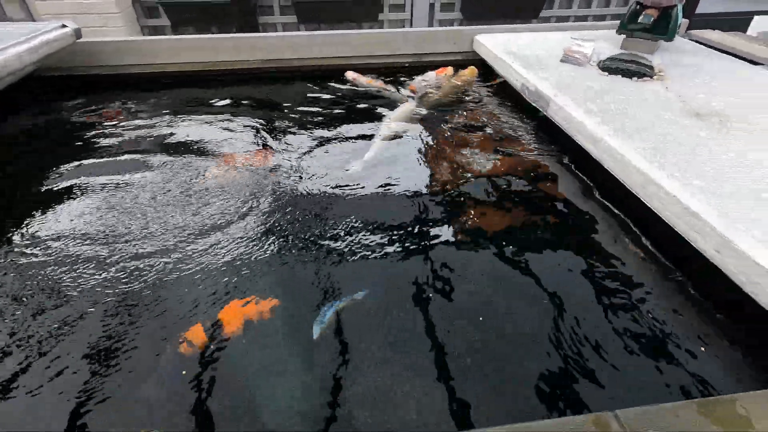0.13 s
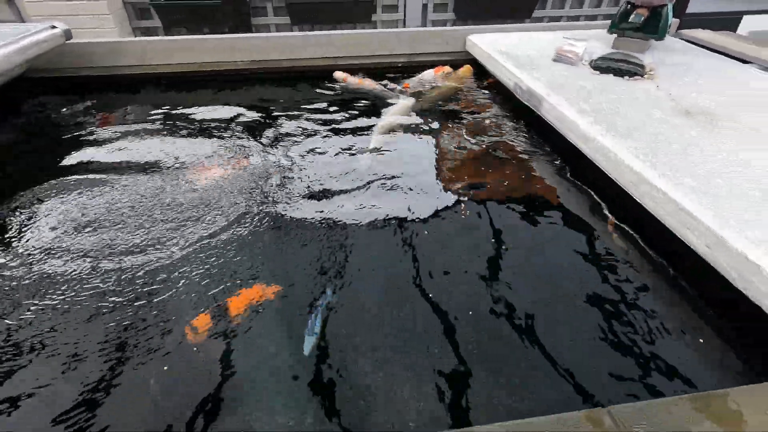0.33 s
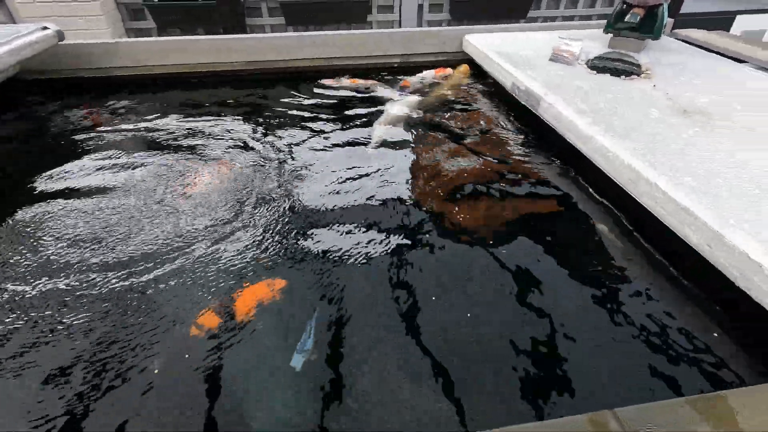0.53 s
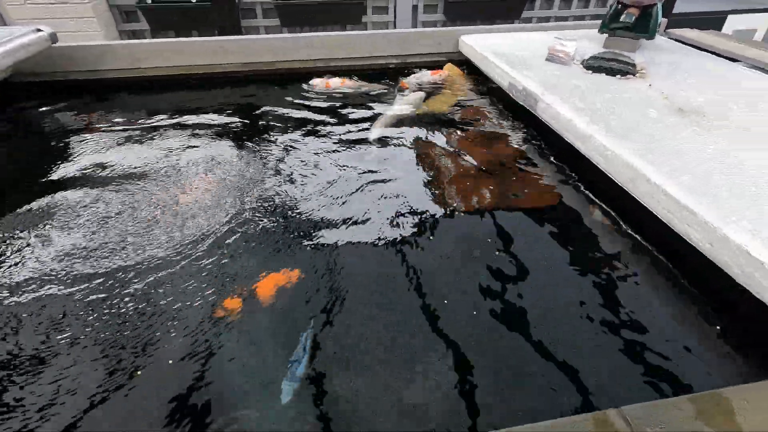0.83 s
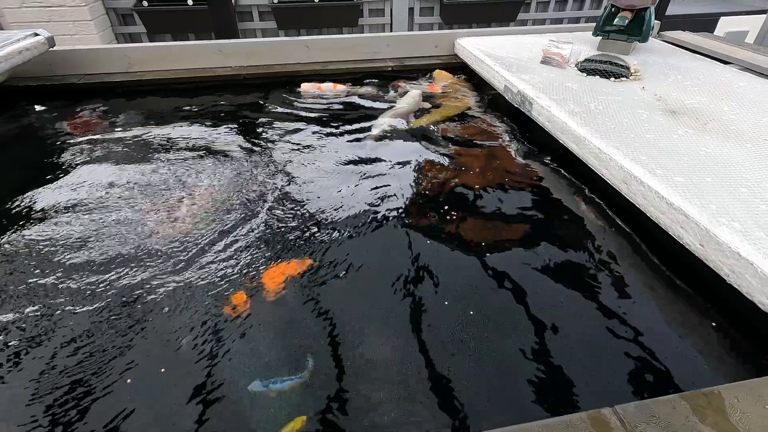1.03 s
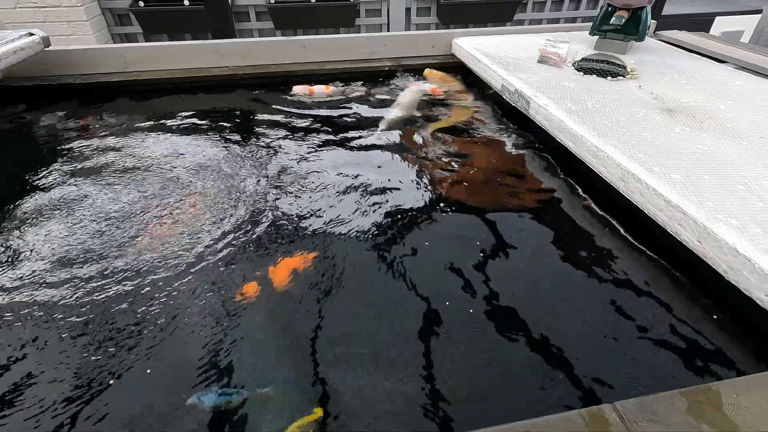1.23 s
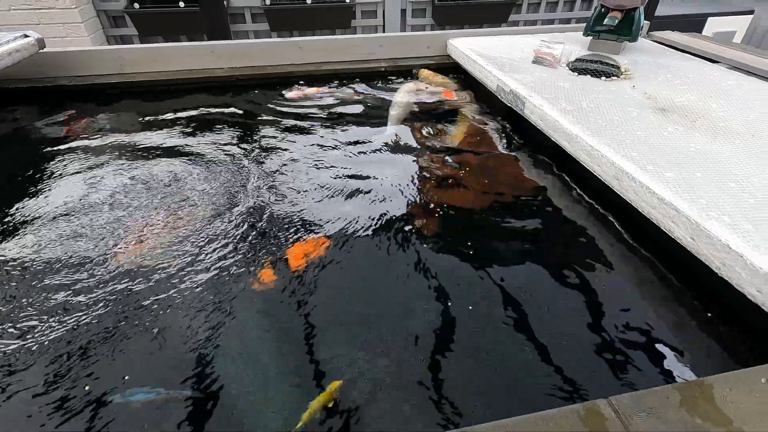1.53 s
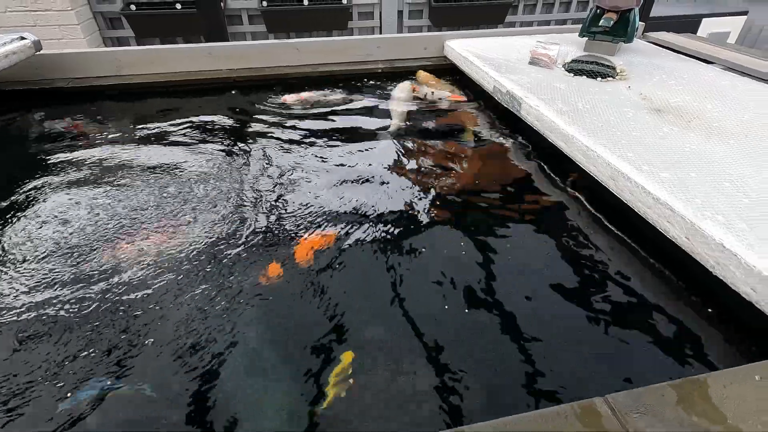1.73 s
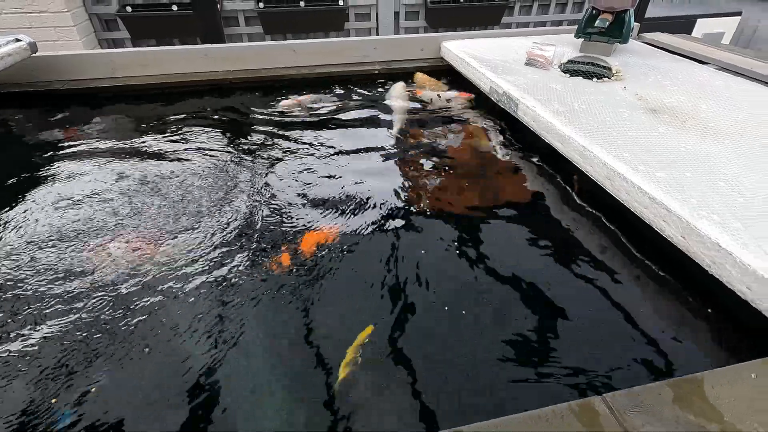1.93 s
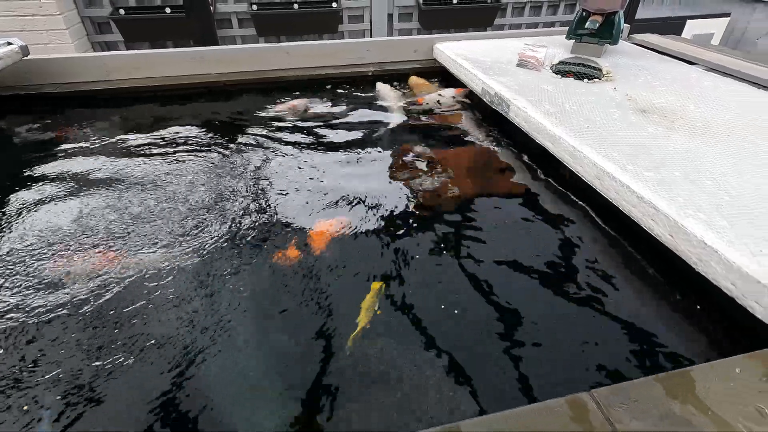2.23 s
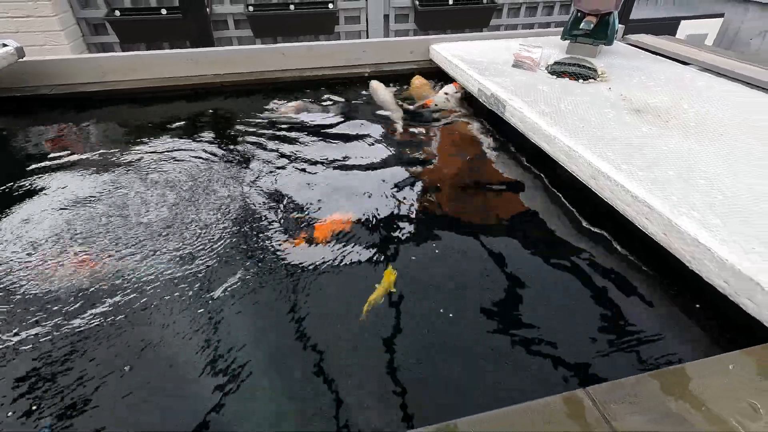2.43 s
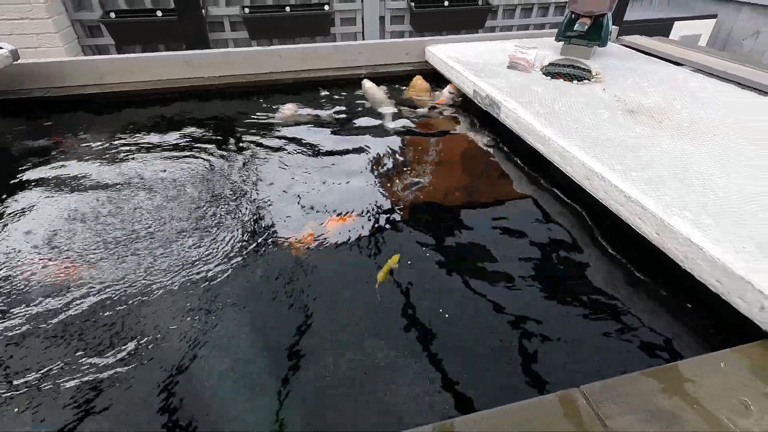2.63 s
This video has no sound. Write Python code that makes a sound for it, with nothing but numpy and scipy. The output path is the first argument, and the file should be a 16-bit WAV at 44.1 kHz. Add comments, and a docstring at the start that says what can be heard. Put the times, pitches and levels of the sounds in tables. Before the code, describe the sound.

Fish mouths plop and slap the water, bubbles trickling, one sharp snap, above a soft steady hum

```python
"""Koi feed at the surface of a walled garden pond: gulps and plops are damped sines that rise in pitch.
Slaps throw short sprays of ringing droplets and a puff of filtered noise; closing air pockets glide up.
Clumps of small bubbles trickle over a soft noise hiss, and the pond's walls answer with a brief noise tail.
A pump hums as two wavering tones over a low rumble, faint high whistles glide past,
and wind bumps the microphone once as a damped low sine."""
import sys
import numpy as np
from scipy import signal
from scipy.fft import rfft, irfft, next_fast_len
from scipy.io import wavfile
from scipy.ndimage import uniform_filter1d, map_coordinates

SR = 44100
rng = np.random.default_rng(int(sys.argv[2]) if len(sys.argv) > 2 else 0)


def field_ratio(decibels):
    """Amplitude ratio for a level in dB (20 dB per decade); scalars and array-likes work."""
    return 10 ** (np.asarray(decibels, dtype=float) / 20)


def wav_record(signal):
    """Record a signal, one row per channel, as 16-bit PCM in the file named by sys.argv[1]."""
    frames = np.transpose(np.atleast_2d(signal))
    bounded = np.clip(frames, -1, 1)
    # unit amplitude maps onto the largest positive 16-bit level
    quanta = np.round(bounded * 32767).astype(np.int16)
    wavfile.write(sys.argv[1], SR, quanta)


N = 123479  # samples

# Large bubbles. Each row: start in seconds, relative level in dB, starting pitch in Hz,
# time to ring down by 60 dB in seconds.
LARGE_BUBBLES = [(.002, -26.5, 1210, 0.015), (0.047, -34, 1035, 0.028), (0.1175, -20.5, 1300, 0.0078),
                 (.255, -37, 985, 0.024), (.31, -43.5, 1863, 0.11), (0.335, -26.5, 930, 0.021),
                 (0.37, -28, 1216, 0.025), (0.371, -47, 2630, 0.033), (0.418, -43, 915, 0.05),
                 (0.443, -32, 1007, 0.048), (0.456, -34, 1020, 0.026), (.495, -31.5, 482, 0.09),
                 (0.584, -39, 1170, 0.028), (.625, -28, 1670, 0.016), (.63, -32.5, 6260, 0.01),
                 (.634, -29, 458, 0.028), (0.662, -32, 1420, 0.017), (.744, -39, 510, 0.052),
                 (0.768, -33, 1012, 0.035), (0.773, -33, 1230, 0.025), (.863, -27, 512, 0.038),
                 (.888, -28, 1187, 0.017), (0.888, -46.5, 3480, 0.037), (0.914, -35.5, 1183, 0.048),
                 (1.104, -42.5, 2790, 0.021), (1.112, -43, 984, 0.096), (1.226, -34.5, 1040, 0.026),
                 (1.237, -42, 1030, 0.023), (1.289, -28, 1368, 0.019), (1.312, -35, 4520, 0.007),
                 (1.394, -35, 2510, 0.013), (1.423, -26.5, 2556, 0.018), (1.533, -23.5, 354, 0.026),
                 (1.544, -32.5, 956, 0.034), (1.656, -42.5, 3800, 0.0098), (1.731, -38.5, 698, 0.028),
                 (1.823, -38, 1207, 0.029), (2.282, -28.5, 941, 0.038), (2.292, -26, 930, 0.014),
                 (2.641, -25, 674, 0.032), (2.676, -47, 1840, 0.034), (2.703, -33, 1790, 0.033),
                 (2.727, -44.5, 4070, 0.032), (2.755, -50.5, 2430, 0.029), (2.784, -43, 1960, 0.028)]
# Air pockets closing. Each row: start in seconds, relative level in dB, start pitch in Hz,
# length in seconds, end pitch in Hz.
POCKET_GLIDES = [(.338, -28, 620, .035, 1000), (.537, -33, 920, .025, 1250), (.565, -32, 950, .035, 1450),
                 (.562, -40, 480, .045, 800), (1.024, -35, 1500, .016, 2200), (1.172, -31, 1200, .02, 2300),
                 (1.96, -43, 860, .07, 1900), (2.027, -42, 760, .04, 1600), (2.272, -40, 520, .025, 850)]
# The surface film snapping. Each row: start in seconds, relative level in dB, pitch in Hz.
FILM_SNAPS = [(.1173, -22, 3000), (.433, -26, 1700), (.481, -31, 3200), (.605, -37, 5000),
              (.712, -38, 6000), (.79, -39, 7000), (.9393, -3.5, 2850), (.9436, -8, 2200),
              (1.108, -30, 1500), (1.172, -28, 600), (1.392, -29, 3600), (2.126, -34, 2600),
              (2.146, -33, 1600), (2.244, -28, 800), (2.6455, -12, 3700)]
# Slaps and their sprays. Each row: start in seconds, relative level in dB, middle droplet pitch in Hz,
# length in seconds, pitch scatter in octaves.
SLAPS = [(.003, -36.5, 1520, 0.074, 0.12), (0.1157, -36, 3000, .03, 0.34), (0.253, -36, 2250, 0.082, 0.55),
         (0.279, -40, 3650, 0.17, 0.48), (0.417, -32.5, 3240, 0.14, 0.13),
         (0.432, -33.5, 2100, 0.041, 0.78), (0.627, -32.5, 2010, 0.077, 0.81),
         (0.936, -21, 2070, 0.069, 0.85), (.939, -28.5, 853, 0.031, 0.64), (1.186, -39, 3560, 0.064, 0.59),
         (1.546, -38, 2770, 0.075, 0.91), (1.776, -37.5, 2360, 0.03, 0.96),
         (1.792, -38, 4000, 0.027, 0.066), (1.88, -47, 980, 0.038, 0.48), (1.917, -31.5, 957, 0.067, 0.54),
         (2.621, -38.5, 11600, .03, 0.12), (2.637, -26.5, 1236, 0.051, 0.7), (2.651, -36, 4970, 0.059, 1.1)]
# Swell of the small bubbles. Each row: time in seconds, relative level in dB.
TRICKLE_LEVEL = [(0, -49.5), (.17, -51.5), (.3, -38), (.6, -48), (.7, -48), (1.1, -45.5), (1.35, -51),
                 (1.5, -43), (1.65, -51.5), (2.0, -51.5), (2.2, -48.5), (2.55, -47.5), (2.68, -47.5)]
# Swell of the water hiss, followed by the fizz. Each row: time in seconds, relative level in dB.
HISS_LEVEL = [(0, -59), (.27, -53.5), (.45, -52.5), (.54, -57), (.7, -53), (1.2, -55), (1.8, -54.5),
              (2.5, -55), (2.68, -53)]
# Tone colour of the hiss. Each row: frequency in Hz, relative level in dB.
HISS_SPECTRUM = [(150, 13), (290, 1), (810, -10.5), (968, -4), (3050, -13.5), (6890, -11.5), (9000, -24),
                 (12300, -18), (13600, -34), (15600, -65)]
# Tone colour of the rumble. Each row: frequency in Hz, relative level in dB.
RUMBLE_SPECTRUM = [(15, -9), (35, 1), (50, 0), (65, -4.5), (100, 1.5), (260, -9.5), (450, -11),
                   (900, -45.5)]
# Stereo width of the hiss and rumble. Each row: frequency in Hz, left-right correlation from 0 to 1.
LIKENESS = [(25, 0.3), (100, .85), (300, .8), (1400, 0.55), (3100, 0.45), (6800, 0.75), (13000, 0.55)]
# Decay of the wall reflections. Each row: frequency in Hz, time to fall by 60 dB in seconds.
WALL_DECAY = [(200, 0.047), (2000, 0.11), (10000, 0.022)]
# Swell of the lower pump tone. Each row: time in seconds, level in dB.
HUM_LEVEL = [(0, -44.5), (.3, -42), (.45, -39.5), (.6, -38.5), (.76, -37), (1.0, -40.5), (1.35, -44),
             (1.9, -39), (2.0, -38), (2.1, -33.5), (2.22, -37.5), (2.7, -42)]
# Faint whistles. Each row: start in seconds, length in seconds, start pitch in Hz, end pitch in Hz,
# relative level in dB.
FAINT_WHISTLES = [(.65, .14, 3800, 4500, -55), (1.69, .12, 3000, 4000, -57), (2.08, .08, 10750, 11050, -66),
                  (2.40, .17, 11250, 10900, -66)]
# Colour difference of the two microphones. Each row: frequency in Hz, left over right in dB.
LEFT_OVER_RIGHT_DB = [(30, 1.5), (600, 0), (1800, -1.8), (12000, 4.5)]

BUBBLE_RISE = 0.11  # share of the pitch gained over the ring time
TWIN_DB, TWIN_DETUNE = -7, 0.07  # the smaller neighbour: trim in dB, greatest detune as a share of pitch
ROUGH, ROUGH_PER_S = 0.5, 240  # depth of the random roughness, knots a second
GLIDE_BEND, GLIDE_FADE_DB = 1.8, 10  # curve of the pitch sweep, fade over its length
SNAP_TURNS = 12  # cycles to fall by 60 dB
DROPLETS_PER_SLAP, DROPLET_TURNS = 38, 8.3  # turns: cycles to fall by 20 dB
SPRAY_DB, SPRAY_FADE_DB = -3, 51  # trim on the slap level, fade over its length
UNEVEN_DB = 2.5  # spread of level from droplet to droplet and bubble to bubble
MIST_DB, MIST_HZ = -21.5, 5940  # trim on the slap level, corner of the treble tilt
CLUMP_SIZE, CLUMP_S, CLUMP_UNEVEN_DB = 9, 0.012, 3.2  # bubbles, spread in seconds, strength in dB
TRICKLE_HZ, FIZZ_HZ, FIZZ_DB = 1092, 5490, -8  # middle pitches, fizz trim on the hiss curve
WALLS_DB, WALLS_UNLIKE = -8.5, 0.39  # level of the answer, share that differs between sides
BUMP_AT_S, BUMP_HZ, BUMP_DB, BUMP_T60_S = 2.174, 38, -17.5, 0.039
HUM_HZ, HUM_WAVER_DB = 121.5, 0.8
UPPER_HUM_HZ, UPPER_HUM_DB = 200.2, -51
RUMBLE_DB, RUMBLE_PATCHY_DB = -46.5, 2
HISS_PATCHY_DB, SURGE_DB = 1.5, 1.2
TOP_HZ, LEFT_LAG_S = 15730, 0.85 / SR


def unit(x):
    """Scale to rms 1."""
    return x / np.sqrt(np.mean(x ** 2) + 1e-20)


def along(points, hz):
    """Read (Hz, value) points on a log frequency axis."""
    f, v = np.transpose(points)
    return np.interp(np.log(hz + 1), np.log(f + 1), v)


def curve(points):
    """Join (seconds, value) points into one value per sample."""
    s, v = np.transpose(points)
    return np.interp(np.arange(N) / SR, s, v)


def wobble(rate):
    """A smooth random curve with rate knots a second."""
    return map_coordinates(rng.standard_normal(int(N * rate / SR) + 4), [np.arange(N) * rate / SR])


def filtered(x, response):
    """Shape x by a response given as a function of frequency."""
    m = next_fast_len(N + 8192)
    return irfft(rfft(x, m) * response(np.fft.rfftfreq(m, 1 / SR)), m)[..., :N]


def progress(start, length):
    """A ramp from 0 to 1 over one event, held outside it."""
    return np.clip((np.arange(N) / SR - start) / length, 0, 1)


def sine(hz):
    """A sine that follows a pitch curve, by summing its phase."""
    return np.sin(2 * np.pi * np.cumsum(hz) / SR)


def rush(spectrum, patchy_db):
    """Stereo noise of rms 1, with random gain patches in time and pitch and a set left-right likeness."""
    z = signal.stft(rng.standard_normal((2, N)), nperseg=512)[2]
    field = uniform_filter1d(rng.standard_normal(z.shape[1:]), size=8, axis=0)
    field = uniform_filter1d(field, size=5, axis=1)
    pair = signal.istft(z * field_ratio(patchy_db * unit(field)), nperseg=512)[1][:, :N]

    def response(hz):
        # sharing power between mid and side by this angle sets the correlation
        angle = np.arccos(np.clip(along(LIKENESS, hz), -1, 1)) / 2
        return field_ratio(along(spectrum, hz)) * [np.cos(angle), np.sin(angle)]

    mid, side = filtered(pair, response)
    return unit(np.array([mid + side, mid - side]))


def bubbles(s, db, hz, t60, rise, pan_db, size, attack_turns=0.27):
    """Ringing air: damped sines of rising pitch, swelling over attack_turns cycles, summed in stereo."""
    t = np.arange(size) / SR
    columns = np.broadcast_arrays(s, db, hz, t60 + 1e-4, rise, pan_db)
    s, db, hz, t60, rise, pan_db = [np.reshape(v, (-1, 1)) for v in columns]
    hz = np.clip(hz, 100, SR / 3)
    phase = 2 * np.pi * hz * (t + rise * np.minimum(t, t60) ** 2 / (2 * t60))
    attack = 1 - np.exp(-t * hz / attack_turns)
    ring = field_ratio(db - 60 * t / t60) * attack * np.sin(phase)
    at = np.clip(np.round(s * SR).astype(int), 0, N) + np.arange(size)

    def placed(side):
        return np.bincount(at.ravel(), (ring * field_ratio(side * pan_db / 2)).ravel(), N + size + 1)[:N]

    return np.array([placed(1), placed(-1)])


def scatter(level_db, count, centre_hz, spread, turns, pan_db, size):
    """Small bubbles in random clumps of shared strength, each of random pitch, under a level curve."""
    clumps = [rng.random(count) * N / SR, rng.exponential(size=count)]
    s, strength = np.repeat(clumps, CLUMP_SIZE, axis=1)
    pitch, pan, late, loud = rng.standard_normal((4, len(s)))
    hz = centre_hz * np.exp(spread * pitch)
    db = CLUMP_UNEVEN_DB * np.minimum(strength, 3) + UNEVEN_DB * loud
    rings = bubbles(s + CLUMP_S * np.abs(late), db, hz, turns / hz, 0.33, pan_db * pan, size=size)
    return field_ratio(level_db) * unit(rings)


def plops():
    """Large bubbles of feeding mouths, each ringing with a smaller, detuned neighbour that beats with it."""
    s, db, hz, t60 = np.transpose(LARGE_BUBBLES)
    pan, detune, late = rng.standard_normal((len(s), 3)).T
    main = bubbles(s, db + 4.5, hz, t60, BUBBLE_RISE, 1.2 * pan, size=4096, attack_turns=1.51)
    twin_hz = hz * (1 + TWIN_DETUNE * np.clip(detune, -1, 1))
    twin = bubbles(s + 0.0044 * np.abs(late), db + TWIN_DB, twin_hz, t60, BUBBLE_RISE, 0.72 * pan,
                   size=4096, attack_turns=5.7)
    return main + twin


def closing_pockets():
    """Air pockets closing: tones that sweep ever faster upward under a quick swell and slower fade."""
    out = 0
    for s, db, hz0, length, hz1 in POCKET_GLIDES:
        u = progress(s, length)
        swell = np.sqrt(np.abs(np.sin(np.pi * np.sqrt(u)))) * (u < 1)
        out = out + field_ratio(db - GLIDE_FADE_DB * u) * swell * sine(hz0 + (hz1 - hz0) * u ** GLIDE_BEND)
    return out


def film_snaps():
    """The surface film snapping: very short rings of steady pitch, leaning right."""
    s, db, hz = np.transpose(FILM_SNAPS)
    return bubbles(s, db, hz, SNAP_TURNS / hz, 0, -2.9, size=1200, attack_turns=1)


def gulps():
    """Feeding mouths: plops and closing pockets roughened by a fast random gain, plus clean film snaps."""
    rings = plops() + closing_pockets()
    return rings * (1 + ROUGH * wobble(ROUGH_PER_S)) + film_snaps()


def splashes():
    """Each slap is a shower of ringing droplets, slightly thicker at first, thinning and fading."""
    s, db, hz, length, octaves = np.repeat(np.transpose(SLAPS), DROPLETS_PER_SLAP, axis=1)
    order = np.arange(len(s)) % DROPLETS_PER_SLAP
    u = (order + rng.random(len(s))) / DROPLETS_PER_SLAP  # place within the spray, 0 to 1
    pitch, loud, pan = rng.standard_normal((len(s), 3)).T
    hz = hz * 2 ** (octaves * np.clip(pitch, -1.5, 3))
    db = db + SPRAY_DB - SPRAY_FADE_DB * u ** 1.67 + UNEVEN_DB * loud
    return bubbles(s + u ** 1.1 * length, db, hz, 3 * DROPLET_TURNS / hz, 0.24, UNEVEN_DB * pan,
                   size=900, attack_turns=0.7)


def mist():
    """Fine spray: each slap throws a puff of bright noise that falls 40 dB over the slap's length."""
    t = np.arange(N) / SR
    puffs = sum(field_ratio(db + MIST_DB - 40 * np.abs(t - s) / length) * (t > s)
                for s, db, hz, length, octaves in SLAPS)
    noise = rng.standard_normal(N) + 1.1 * rng.standard_normal((2, N))  # partly shared by both sides

    def bright(hz):
        return hz / (hz + MIST_HZ) * field_ratio(along(HISS_SPECTRUM, np.maximum(hz, MIST_HZ)))

    return puffs * unit(filtered(noise, bright))


def trickle():
    """Small bubbles ringing in loose clumps throughout."""
    return scatter(curve(TRICKLE_LEVEL) - 5.5, count=220, centre_hz=TRICKLE_HZ, spread=0.3596,
                   turns=26.5, pan_db=7.0, size=2400)


def fizz():
    """Tiny, high bubbles that swell with the hiss."""
    return scatter(curve(HISS_LEVEL) + FIZZ_DB, count=200, centre_hz=FIZZ_HZ, spread=0.379,
                   turns=48, pan_db=5.5, size=700)


def walls(x):
    """The pond's walls answer through a brief decaying noise tail, a little different on each side."""
    hz, t, z = signal.stft(rng.standard_normal((2, SR // 4)), SR, nperseg=256)
    decay = field_ratio(-60 * t / along(WALL_DECAY, hz)[:, None])
    a, b = signal.istft(z * decay, SR, nperseg=256)[1]
    tail = np.array([a + WALLS_UNLIKE * b, a - WALLS_UNLIKE * b])
    return signal.fftconvolve(x, tail / np.linalg.norm(tail[0]), axes=1)[:, :N]


def bump():
    """Wind pushes the microphone once: a damped low sine, unequal on the two ports."""
    t = np.clip(np.arange(N) / SR - BUMP_AT_S, 0, None)
    envelope = field_ratio(BUMP_DB - 60 * t / BUMP_T60_S) * (1 - np.exp(-t / 0.00081))
    return -envelope * np.sin(2 * np.pi * BUMP_HZ * t) * field_ratio(np.array([[1.5], [-1.5]]))


def pump():
    """Two tones, slightly unsteady in pitch and level, over a low rumble of shaped noise."""
    lower = sine(HUM_HZ + 1.0 * wobble(8.97))
    # the lower tone wavers separately on each side
    lower_db = curve(HUM_LEVEL) + HUM_WAVER_DB * np.array([wobble(17), wobble(11.1)])
    upper = sine(UPPER_HUM_HZ + 1.39 * wobble(7.69))
    upper_db = UPPER_HUM_DB + 0.83 * wobble(5.9)
    tones = np.sqrt(2) * (field_ratio(lower_db) * lower + field_ratio(upper_db) * upper)  # root 2 makes the levels rms
    return tones + field_ratio(RUMBLE_DB) * rush(RUMBLE_SPECTRUM, RUMBLE_PATCHY_DB)


def whistles():
    """Thin gliding tones from far off, made breathy by a fast random gain."""
    out = 0
    for s, length, hz0, hz1, db in FAINT_WHISTLES:
        u = progress(s, length)
        swell = np.sqrt(np.abs(np.sin(np.pi * u))) * (u < 1)
        out = out + field_ratio(db) * wobble(450) * swell * sine(hz0 + (hz1 - hz0) * u)
    return out


def water_hiss():
    """Soft, patchy noise of the water, surging gently along its level curve."""
    level_db = curve(HISS_LEVEL) + 3 + SURGE_DB * wobble(22.89)
    return field_ratio(level_db) * rush(HISS_SPECTRUM, HISS_PATCHY_DB)


def scene():
    """Fish and small bubbles with the walls' answer, then hiss, pump, whistles and wind."""
    small_bubbles = trickle() + fizz()
    hiss = water_hiss()
    near = gulps() + splashes() + mist() + small_bubbles
    return near + field_ratio(WALLS_DB) * walls(near) + hiss + pump() + whistles() + bump()


def roll_off(x):
    """The treble ends steeply here."""
    return signal.sosfilt(signal.butter(12, 15730, fs=SR, output="sos"), x)


def record(dry):
    """Two microphones that differ in colour and by a small lag, cut off above the top frequency."""
    side = np.array([[1], [-1]])

    def ports(hz):
        colour = field_ratio(along(LEFT_OVER_RIGHT_DB, hz) / 2 * side)
        lag = np.exp(-1j * np.pi * hz * LEFT_LAG_S * side)  # half the lag each way
        return colour * lag * (hz < TOP_HZ)

    return roll_off(filtered(dry, ports))


dry = scene()
out = record(dry)
wav_record(out)
```